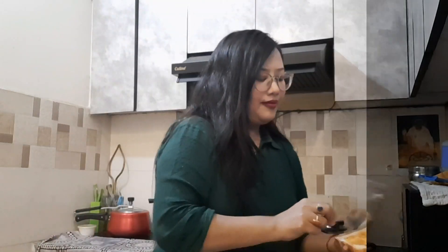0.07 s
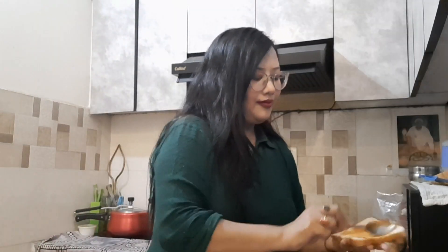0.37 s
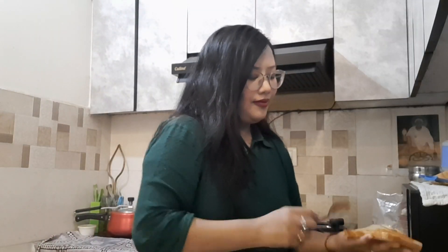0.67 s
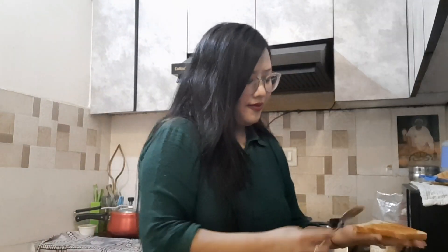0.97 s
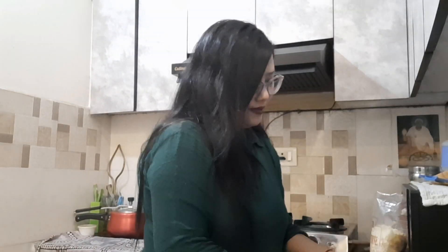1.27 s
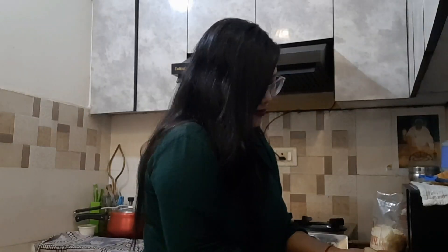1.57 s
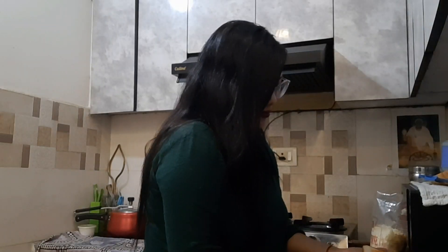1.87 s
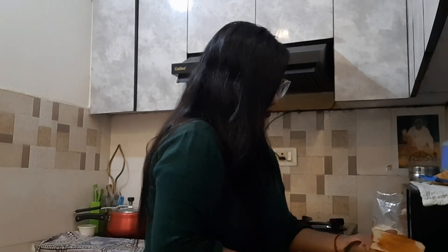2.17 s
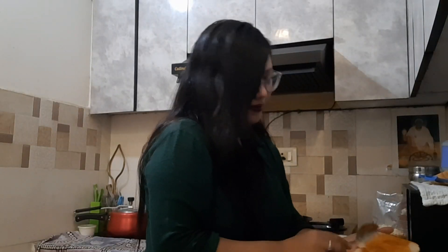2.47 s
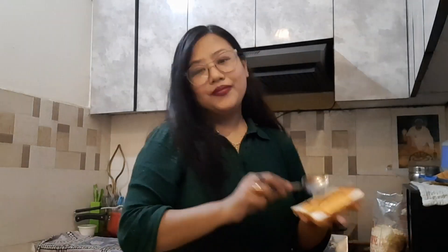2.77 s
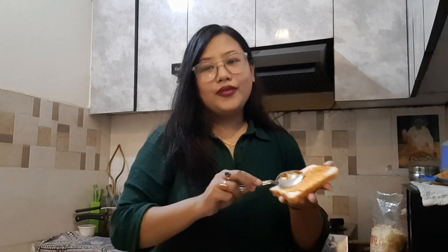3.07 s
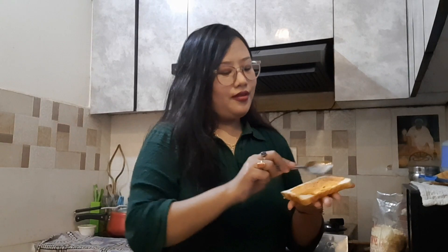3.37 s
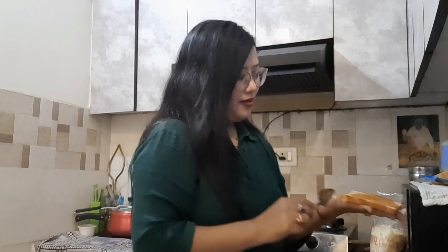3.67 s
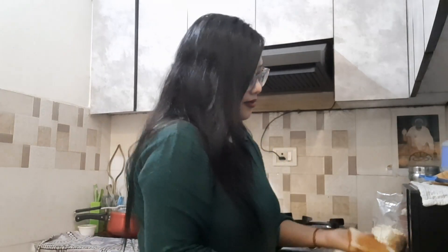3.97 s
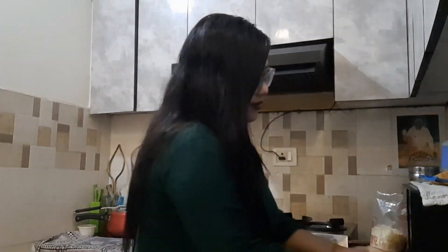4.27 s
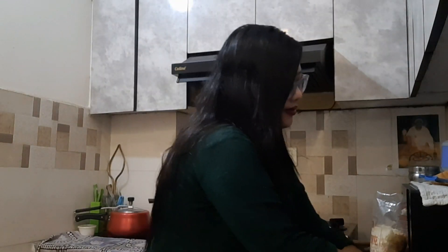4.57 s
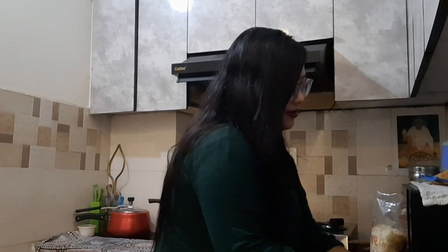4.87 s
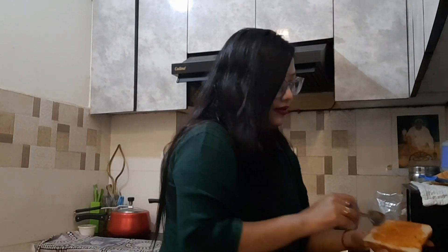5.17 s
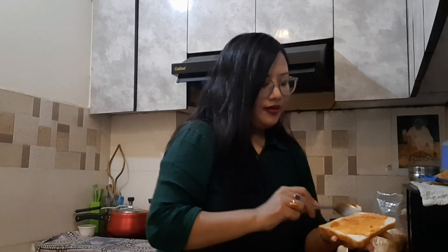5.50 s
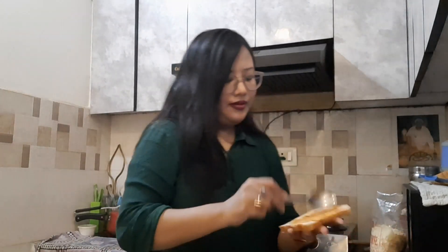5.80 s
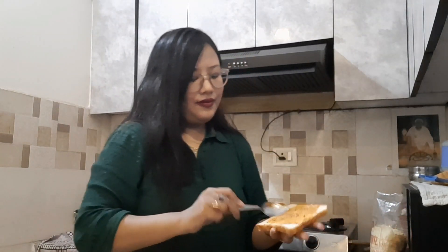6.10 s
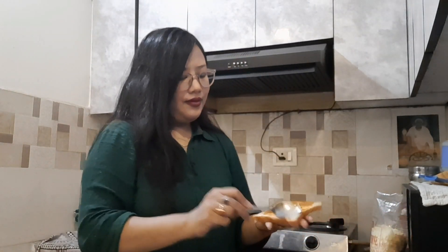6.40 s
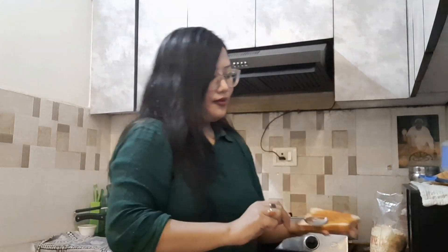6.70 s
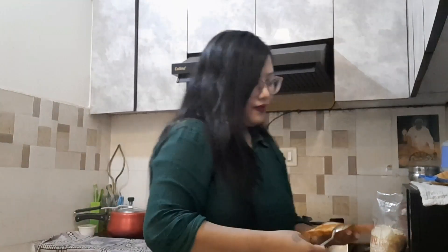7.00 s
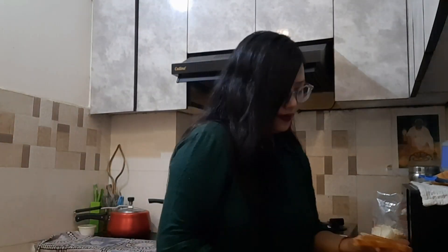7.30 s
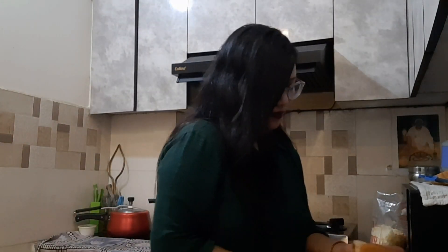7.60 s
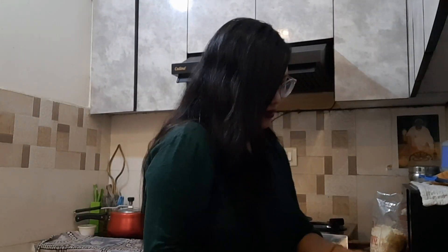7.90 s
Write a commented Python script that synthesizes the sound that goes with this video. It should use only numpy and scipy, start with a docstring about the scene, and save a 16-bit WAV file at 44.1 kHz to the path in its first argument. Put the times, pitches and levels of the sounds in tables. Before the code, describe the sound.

A soft bag of bread lands on the counter of a small tiled kitchen with a hollow thump. A spoon faintly dabs sauce onto toast, then knocks and scrapes in a dish. Near the end it drops against the dish with a loud clatter and a bright steel clink. Dull foot shuffles and a low appliance hum lie underneath, heard in stereo from the counter.

```python
"""A small tiled kitchen, heard at the counter through a closely spaced stereo pair of microphones.
A bag of bread thumps down and the counter booms. A spoon dabs sauce onto toast, scrapes and knocks
in a dish, then is dropped against it with a clatter and a steel clink; the tiles answer each blow.
Feet shuffle dully over a low appliance hum, and something squeaks faintly far away."""
import sys
import numpy as np
from scipy import signal
from scipy.fft import rfft, irfft, next_fast_len
from scipy.io import wavfile
from scipy.ndimage import map_coordinates

SR = 44100
rng = np.random.default_rng(int(sys.argv[2]) if len(sys.argv) > 2 else 0)


def transcribe(signal):
    """Save signal, clipped to [-1, 1], as a 16-bit WAV file at the path in sys.argv[1]."""
    frames = np.atleast_2d(signal).T
    limited = np.clip(frames, -1, 1)
    pcm = np.round(limited * 32767).astype(np.int16)
    wavfile.write(sys.argv[1], SR, pcm)


N = 355005


def spoon():
    """The dropped spoon skids and bounces on the dish, which rings; its own steel rings last."""
    # blows that ring the dish, and the steel: start_s, level_db, rise_s, burst_t60_s, ring_db
    clatters = [(7.409, -21.5, 0.00208, 0.111, -10), (7.416, -14, 0.00104, 0.056, -13),
                (7.474, -36, 0.0042, 0.106, -12), (7.518, -29, 0.0009, 0.059, -25),
                (7.562, -42, 0.0021, 0.06, -10.5)]
    clinks = [(2.049, -52.5, 0.00089, 0.035, -1.5), (7.519, -35, 0.00046, 0.065, 0),
              (7.6065, -20.5, .0012, 0.105, -2.5), (7.627, -23.5, 0.0017, 0.1055, -4.5),
              (7.653, -32.5, 0.0019, 0.039, -5)]
    # modes of dish and spoon: pitch_hz, level_db, base_t60_s
    dish_modes = [(791, 0, 0.099), (2353, -1, 0.15), (3784, -2, 0.12), (3973, -5, 0.14), (4280, -12, 0.17),
                  (6062, -17, 0.36), (6665, -10, 0.23), (6864, -15, 0.45), (8296, -10, 0.12),
                  (11700, -18, 0.14), (12370, -6, 0.073), (13040, -10, 0.089), (14450, -21, 0.14)]
    steel_modes = [(1030, -5, .15), (1700, 0, .25), (2240, -6, .22), (2352, -4, .23), (3578, -6, .14),
                   (4303, -7, .16), (4703, -3, .18), (5690, -12, .13), (6675, -6, .16), (8000, -9, .15),
                   (9362, -15, .13), (11934, -11, .15), (12664, -10, .16), (15043, -13, .13)]
    # contact noise of a clatter, and of a clink: frequency_hz, level_db
    crash = [(120, -64), (200, -40), (423, -21), (788, -6), (912, -14.5), (1310, -2.5), (1440, -27.5),
             (1520, -6), (1730, -17), (2320, -1), (2730, -10), (3870, -4), (5280, -11.5), (6810, -7.5),
             (15800, -24)]
    chink = [(120, -79.5), (200, -48.5), (472, -16.5), (929, -21.5), (1020, -13), (1470, -17), (1670, -8),
             (2400, -8), (3050, -17), (4640, -3), (5090, -12.5), (8030, -7.5), (10400, -21), (12200, -6.5),
             (15800, -16)]
    dish = struck(clatters, dish_modes, crash, t60_scale=0.8, room_db=2.5)
    steel = struck(clinks, steel_modes, chink, t60_scale=0.902, room_db=1)
    return dish + steel


def bag():
    """The soft bag of bread lands and settles on the counter, which booms."""
    thumps = [(0.0, -35.5, 0.00044, 0.443, -27), (0.04, -35, 0.0322, 0.421, 6.5),
              (0.236, -49, 0.0036, 0.38, -15.5)]  # landings: start_s, level_db, rise_s, burst_t60_s, ring_db
    counter_modes = [(70.0, -8, 0.71), (178, 0, 0.5), (226, -13, 0.42), (269, -10, 0.69), (339, -2, 0.22),
                     (458, -12, 0.88), (592, -13, 0.35), (829, -8, 0.26), (985, 0, 0.075)]  # the boom: pitch_hz, level_db, base_t60_s
    thud = [(26, -45.5), (45, -18), (76, -5.5), (134, -12.5), (173, -3.5), (208, -15), (338, -8),
            (380, -19), (466, -4), (663, -18), (838, -12.5), (1560, -33), (2500, -28.5), (3250, -49.5),
            (5500, -120)]  # contact noise: frequency_hz, level_db
    return struck(thumps, counter_modes, thud, t60_scale=0.668, room_db=-4.5)


def knocks(body_t60_s=0.01728, snap_t60_s=0.0238, rise_s=0.000565):
    """Damped contacts with dish and counter: a hollow body note under a short snap."""
    contacts = [(0.003, -28, -30.5, 0.5), (0.235, -31, -44, 1.5), (0.303, -51.5, -50, 2),
                (2.047, -50, -37.5, 12), (4.542, -35, -47, -5), (4.57, -43, -47.5, 0),
                (4.655, -41, -62, 3.5), (4.725, -36.5, -48, -0.5), (4.955, -46, -48.5, 10.5),
                (5.007, -29, -38.5, 0)]  # each knock: start_s, body_db, snap_db, room_db
    # spectra of body and snap: frequency_hz, level_db
    hollow = [(120, -18.5), (220, -16.5), (370, 0), (550, -8.5), (800, 1.5), (1000, 2.5), (1350, -7.5),
              (1720, 6), (2050, -2), (2350, 1), (3000, -10), (4500, -25)]
    snap = [(880, -27), (1500, -13), (1640, -11), (2290, -2), (2660, -13.5), (4750, -3), (5040, -16),
            (6710, -10.5), (9100, -23), (13100, -25.5), (15800, -34.5)]
    out, t = np.zeros((2, N)), np.arange(SR // 8) / SR
    attack = 1 - np.exp(-t / rise_s)
    for start_s, body_db, snap_db, room_db in contacts:
        note = amp(body_db - 60 * t / body_t60_s) * coloured(rng.standard_normal(len(t)), hollow)
        tick = amp(snap_db - 60 * t / snap_t60_s) * coloured(rng.standard_normal(len(t)), snap)
        add(out, start_s, kitchen((note + tick) * attack, room_db))
    return out


def dabs(press_s=0.0372, lift_s=0.0424, squelch_db=-3):
    """The spoon presses on the toast and lifts: dry crust with a little wet sauce; once, near 4.88 s, it
    brushes the dish instead."""
    touches = [(0.466, -65.5, -3.5), (0.652, -72, -15.5), (1.301, -74, 6.5), (1.465, -70, 3.5),
               (1.716, -74.5, -0.5), (2.608, -69.5, -16.5), (2.788, -64.5, -14.5), (2.971, -62.5, -8.5),
               (3.165, -69.5, -3), (3.363, -72, -4.5), (3.541, -69, -7.5), (4.878, -66, 2),
               (5.77, -65.5, -9.5), (5.973, -63.5, -9.5), (6.161, -62, -7.5), (6.338, -65.5, -2),
               (7.926, -69, -4)]  # each dab (the row at 4.878 s a brush in the dish): peak_s, level_db, relative_sauce_db
    # spectra of crust and sauce: frequency_hz, level_db
    crust = [(940, -44), (1600, -12.5), (2420, -0.5), (3350, -10.5), (3900, -4.5), (4290, -15),
             (4770, -8.5), (5400, -11.5), (6930, -5.5), (9330, -15), (11600, -10), (15800, -10.5)]
    squelch = [(500, -8.5), (900, 7.5), (1300, 8), (2400, -18), (3500, -30)]
    pressure = np.array([amp(db) * swell(peak_s, press_s, lift_s) for peak_s, db, _ in touches])
    sauce_db = np.array(touches)[:, 2:]
    crunch = pressure.sum(0) * coloured(grainy(rate=130, depth_db=2.5), crust)
    sauce = (pressure * amp(sauce_db + squelch_db)).sum(0) * coloured(diffuse(N), squelch)
    return crunch + sauce


def rubbing(scrape_db=3):
    """Friction: the bag crinkles and the spoon scrapes grittily; sleeve and toast slide more smoothly."""
    # gritty and smooth strokes: peak_s, relative_db, rise_s, fall_s
    scrapes = [(0.0, -46, .01, 0.0603), (0.308, -59, 0.0337, 0.0473), (4.564, -54, 0.0319, 0.0764),
               (4.665, -61.5, 0.022, 0.0363), (4.733, -57.5, 0.0162, 0.0298), (4.962, -61.5, 0.0149, 0.075)]
    slides = [(4.215, -67.5, 0.0462, 0.0398), (5.52, -66, 0.106, 0.131), (5.675, -56, 0.0744, 0.0303),
              (7.321, -55.5, 0.0972, .125)]
    # their spectra: frequency_hz, level_db
    grit = [(150, -36.5), (250, -21), (354, 10), (537, -10), (709, 2), (1220, 10), (1700, 0.5), (3050, 1.5),
            (4550, -4), (7150, -3), (9280, -15.5), (13600, -12.5), (15800, -13.5)]
    swish = [(350, -46.5), (600, -7), (747, -9), (905, -36.5), (1140, 1), (1480, -11), (2490, -0.5),
             (3230, -1.5), (7240, 3), (9390, -7.5), (11700, -4.5), (15800, -9.5)]
    scraping = sum(amp(db) * swell(s, rise, fall, shape=1.09) for s, db, rise, fall in scrapes)
    sliding = sum(amp(db) * swell(s, rise, fall) for s, db, rise, fall in slides)
    gritty = amp(scrape_db) * scraping * coloured(grainy(rate=260, depth_db=1.5), grit)
    return gritty + sliding * coloured(grainy(rate=470, depth_db=1.5), swish)


def feet(tread_db=-3, scuff_db=-2, rumble_db=-69.5, shuffle_db=-75.5):
    """Shifting weight thuds in the floor, with muffled scuffs and light shuffling in between; a longer low
    swell rises near 1.8 s, and the dropped spoon's clatter thuds dully through the counter at 7.41 s."""
    # weight shifts (the long row at 1.753 s a low swell, the row at 7.412 s the dull thud of the dropped spoon)
    # and scuffs: start_s, length_s, relative_db
    treads = [(0.859, 0.066, -62), (1.234, 0.054, -59), (1.5, 0.038, -65), (1.753, 0.3, -58),
              (2.184, 0.126, -63), (2.653, 0.03, -63), (3.278, 0.074, -62), (3.655, 0.048, -61),
              (4.006, 0.052, -64), (4.178, 0.174, -57), (4.463, 0.096, -60), (4.583, 0.1, -59),
              (4.722, 0.168, -58), (5.006, 0.074, -61), (5.127, 0.124, -60), (5.473, 0.076, -60),
              (5.566, 0.054, -60), (5.694, 0.136, -57), (6.299, 0.068, -59), (6.855, 0.05, -64),
              (7.412, 0.054, -56)]
    scuffs = [(0.962, 0.091, -71), (1.443, 0.098, -62.5), (1.587, 0.032, -66.5), (1.777, 0.1065, -62.5),
              (1.988, 0.1706, -61.5), (2.229, 0.075, -68.5), (2.46, 0.104, -64.5), (2.634, 0.072, -58.5),
              (2.843, 0.1465, -59.5), (3.349, 0.0406, -69), (3.543, 0.12, -61), (3.856, 0.048, -65),
              (3.95, 0.152, -63), (4.166, 0.1004, -61), (4.361, 0.088, -65), (4.55, 0.284, -63),
              (5.009, 0.039, -72), (5.336, 0.0344, -63)]
    # their spectra: frequency_hz, level_db
    floor_thud = [(15, -47.5), (25, -18), (54, 0), (70, 7.5), (102, 1), (150, -5.5), (200, -39),
                  (330, -120)]
    muffled = [(76, -34), (130, -3), (200, -0.5), (248, -4), (312, -2.5), (404, -15), (600, -24.5),
               (780, -56), (1320, -120)]
    treading = np.hypot(amp(tread_db) * steps(treads), amp(rumble_db + 2.7 * wobble(3.6)))
    scuffing = np.hypot(amp(scuff_db) * steps(scuffs), amp(shuffle_db + 1.1 * wobble(11)))
    return treading * coloured(diffuse(N), floor_thud) + scuffing * coloured(diffuse(N), muffled)


def steps(moves, rise_s=0.014, fall_s=0.016):
    """The envelope of a row of foot movements, each held for its length."""
    return sum(amp(db) * swell(s, rise_s, fall_s, hold=length, shape=0.82) for s, length, db in moves)


def squeaks(sag_share=0.025, width_share=0.185):
    """Faint, far-off tones that sag in pitch; the less pure, the wider their fuzzy edge."""
    calls = [(1.059, 0.392, 2797, -87, 0.26), (2.037, 0.411, 1013, -76.5, .1),
             (3.073, 0.478, 1064, -77, 0.135), (3.746, .35, 2776, -87.5, .15),
             (5.722, 0.387, 2610, -78.5, 0.122), (6.174, 0.1536, 811.5, -71.5, 0.502),
             (6.324, .7, 3320, -80.5, 0.453), (6.593, 0.324, 2947, -80.5, .02),
             (7.857, 0.294, 2454, -78, 0.054)]  # each squeak: start_s, length_s, pitch_hz, level_db, pure_share
    out = np.zeros((2, N))
    for start_s, length_s, pitch_hz, db, pure in calls:
        n, pure = int(length_s * SR), np.clip(pure, 0, .9)
        width_hz = width_share * pitch_hz * (1 - pure)
        fuzz = unit(filtered(rng.standard_normal((2, n)), lambda hz: 1 / (1 + (2 * hz / width_hz) ** 2)))
        glide_hz = pitch_hz * np.linspace(1, 1 - sag_share, n)
        tone = np.sin(2 * np.pi * np.cumsum(glide_hz) / SR)
        squeak = (pure + (1 - pure) * fuzz) * tone * signal.windows.tukey(n)
        add(out, start_s, amp(db) * unit(squeak))
    return out


def background(hum_hz=101, hum_db=-73, waver_db=2.0, wash_db=-2, hiss_db=-75):
    """An appliance's wavering hum, a distant wash that slowly grows, and steady hiss."""
    wash_curve = [(0.9, -81), (2.3, -76.5), (4.2, -74.5), (5.0, -71.5), (8.05, -73)]  # course of the wash: time_s, relative_db
    # spectra of wash and hiss: frequency_hz, level_db
    outside = [(250, -23), (550, 3.5), (1100, 0), (1800, -15.5), (3500, -27)]
    air = [(180, -38), (300, 0), (411, -5.5), (519, -6.5), (676, -10.5), (1150, -11), (1360, -16),
           (1860, -18), (5290, -24), (7250, -21), (9290, -31), (11200, -25), (13600, -19.5), (15800, -21)]
    t = np.arange(N) / SR
    hum = amp(hum_db + waver_db * wobble(2.8)) * unit(np.sin(2 * np.pi * hum_hz * t))
    wash_gain = amp(wash_db + np.interp(t, *np.transpose(wash_curve)))
    wash = wash_gain * coloured(grainy(rate=9.7, depth_db=1.5), outside)
    return hum + wash + amp(hiss_db) * coloured(diffuse(N), air)


def struck(blows, modes, spectrum, t60_scale, room_db):
    """Each blow sends a burst of contact noise into the room and rings the modes at new strengths."""
    out, t = np.zeros((2, N)), np.arange(SR // 2) / SR
    hz, mode_db, base_t60_s = np.transpose(modes)[:, :, None]
    for start_s, db, rise_s, burst_t60_s, ring_db in blows:
        strength = amp(mode_db + rng.standard_normal(hz.shape)) / np.linalg.norm(amp(mode_db))
        # the shorter the wave, the more its phase differs between the microphones
        phase = rng.random(hz.shape) + rng.random((2, *hz.shape)) * np.minimum(hz / 3000, .5)
        swing = np.sin(2 * np.pi * (hz * t + phase))
        ring = (strength * amp(-60 * t / (base_t60_s * t60_scale)) * swing).sum(1)
        burst = coloured(rng.standard_normal(len(t)), spectrum) * amp(-60 * t / burst_t60_s)
        attack = amp(db) * (1 - np.exp(-t / rise_s))
        add(out, start_s, kitchen(attack * burst, room_db))
        add(out, start_s, amp(ring_db) * attack * ring)
    return out


def kitchen(x, room_db, lead_s=.00015):
    """Direct sound, reaching the left microphone first, and a short tail off the tiles."""
    tiles = [(100, 0.53), (500, 0.237), (2500, 0.2058), (7000, 0.1967), (15000, 0.094)]  # the room's decay: frequency_hz, t60_s
    hz, t, z = signal.stft(diffuse(SR // 2), SR, nperseg=256)
    tail = signal.istft(z * amp(-60 * t / along(tiles, hz)[:, None]), SR, nperseg=256)[1]
    answer = amp(room_db) * tail / np.linalg.norm(tail[0])
    answer[0, 0] += 1
    answer[1, round(lead_s * SR)] += 1
    return signal.fftconvolve(x[None], answer / np.linalg.norm(answer[0]), axes=1)


def diffuse(n):
    """Stereo noise from all around: alike in the bass, unrelated in the treble."""
    alike = [(60, 1), (200, 0.7), (500, 0.61), (1000, 0.034), (3000, 0.036)]  # left against right: frequency_hz, correlation
    turn = lambda hz: np.arccos(np.clip(along(alike, hz), -1, 1)) / 2
    mid_side_gains = lambda hz: np.array([np.cos(turn(hz)), np.sin(turn(hz))])
    mid, side = filtered(rng.standard_normal((2, n)), mid_side_gains)
    return np.array([mid + side, mid - side])


def grainy(rate, depth_db):
    """Noise that catches and slips about rate times a second."""
    return amp(depth_db * wobble(rate)) * diffuse(N)


def wobble(rate):
    """A smooth random curve, rate knots a second."""
    return map_coordinates(rng.standard_normal(int(N * rate / SR) + 4), [np.arange(N) * rate / SR])


def swell(s, rise, fall, hold=0, shape=2):
    """An envelope that rises to 1 at time s, holds and falls; a lower shape makes it more pointed."""
    t = np.arange(N) / SR - s
    away = np.maximum(-t / rise, 0) + np.maximum((t - hold) / fall, 0)
    return np.exp(-np.minimum(away, 20) ** shape)


def amp(db):
    """Decibels to gain."""
    return 10 ** (np.asarray(db) / 20)


def unit(x):
    """Scale to rms 1."""
    return x / np.sqrt(np.mean(x ** 2) + 1e-20)


def along(points, hz):
    """(Hz, value) points read on a log axis."""
    f, v = np.transpose(points)
    return np.interp(np.log(hz + 1), np.log(f + 1), v)


def filtered(x, response):
    """x times a response of frequency."""
    n = x.shape[-1]
    m = next_fast_len(n + 8192)
    return irfft(rfft(x, m) * response(np.fft.rfftfreq(m, 1 / SR)), m)[..., :n]


def coloured(x, spectrum):
    """x shaped by a spectrum, at rms 1."""
    return unit(filtered(x, lambda hz: amp(along(spectrum, hz))))


def add(out, s, x):
    """Mix x into out from time s."""
    start = max(round(s * SR), 0)
    out[:, start:start + x.shape[-1]] += x[..., :N - start]


def scene():
    """The kitchen as it reaches the microphones."""
    return bag() + knocks() + dabs() + rubbing() + spoon() + feet() + squeaks() + background()


def record(dry, top_hz=15850):
    """The two microphones differ in colour and keep nothing above top_hz."""
    lean = [(60, -1.5), (100, 1.5), (170, 1), (400, 1.5), (900, 4.5), (2100, 7), (4000, 2), (7300, -2.5),
            (9000, 2.5), (11500, 12.5), (15500, 8.5)]  # their difference: frequency_hz, left_minus_right_db
    return filtered(dry, lambda hz: amp(np.array([[1], [-1]]) * along(lean, hz) / 2) * (hz < top_hz))


dry = scene()
out = record(dry)
transcribe(out)
```